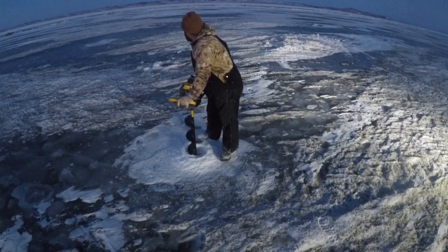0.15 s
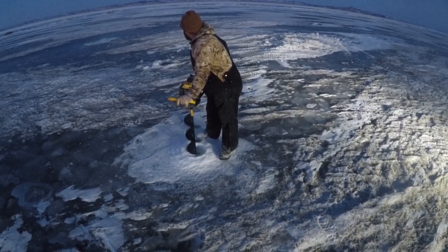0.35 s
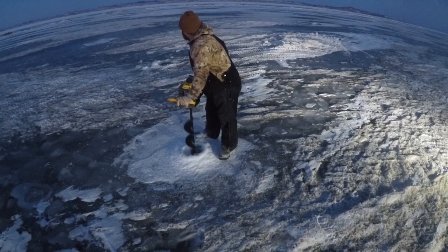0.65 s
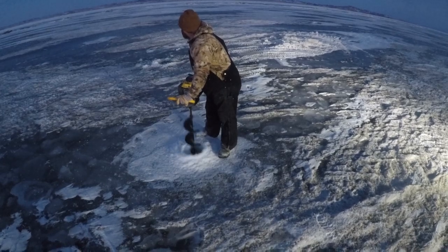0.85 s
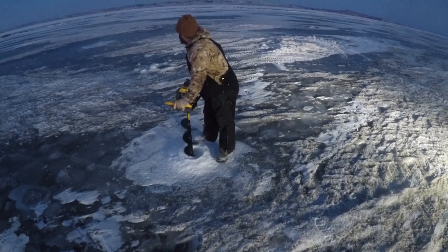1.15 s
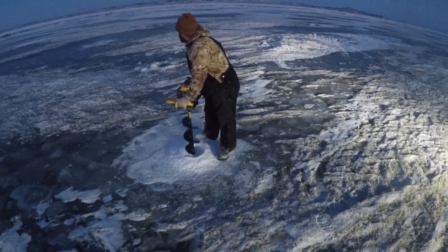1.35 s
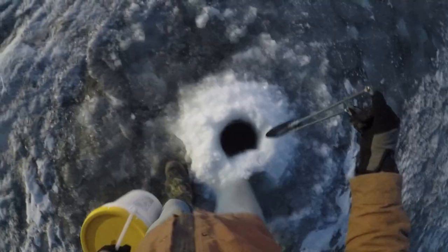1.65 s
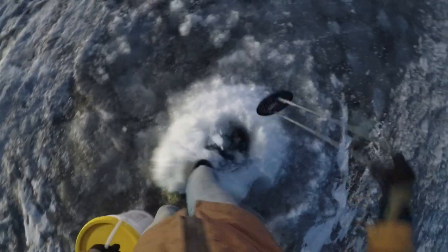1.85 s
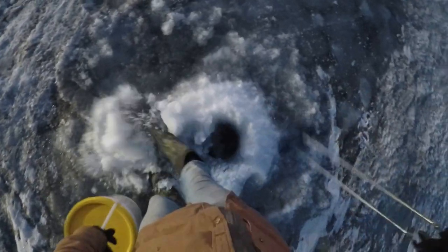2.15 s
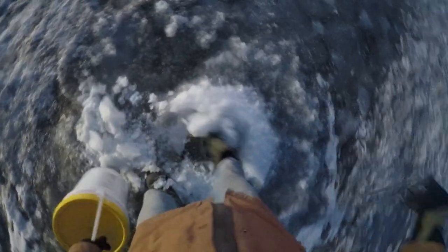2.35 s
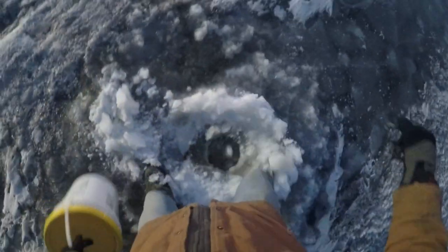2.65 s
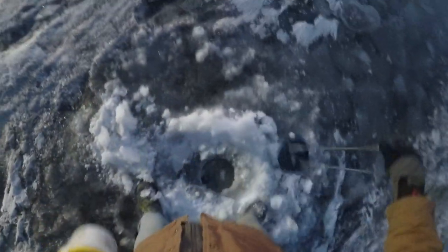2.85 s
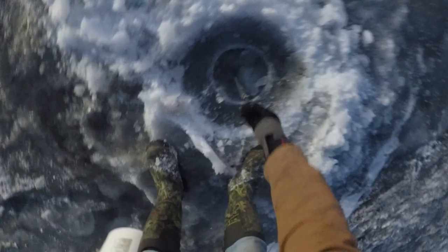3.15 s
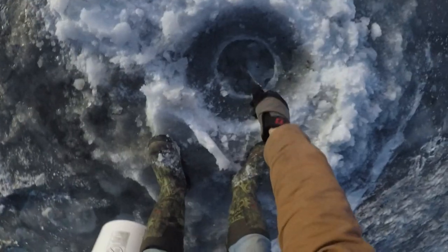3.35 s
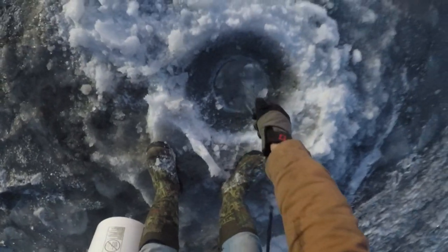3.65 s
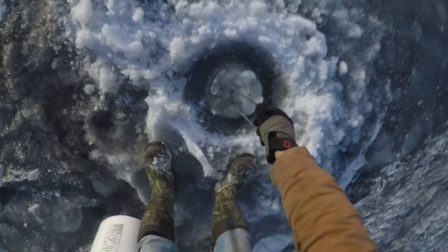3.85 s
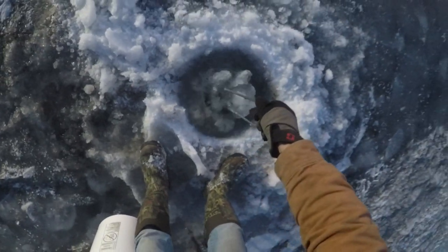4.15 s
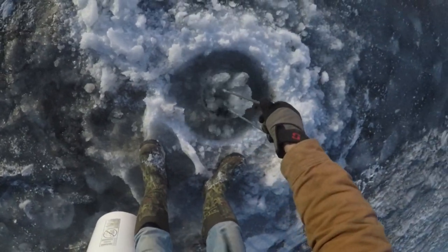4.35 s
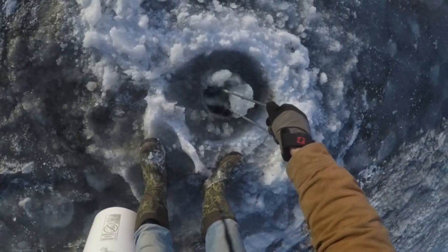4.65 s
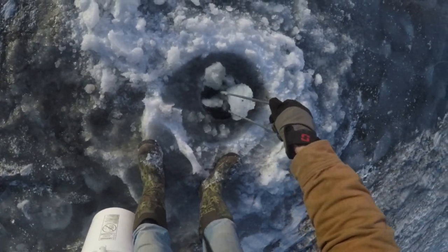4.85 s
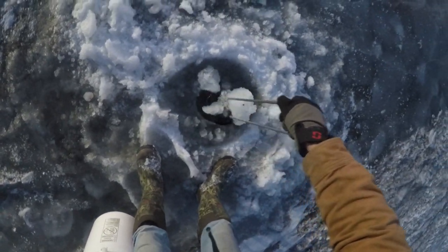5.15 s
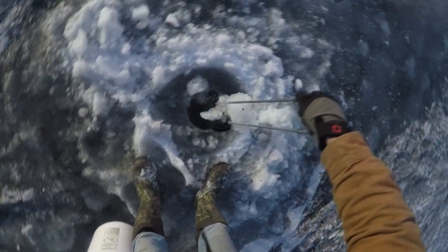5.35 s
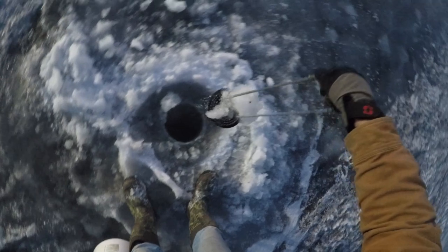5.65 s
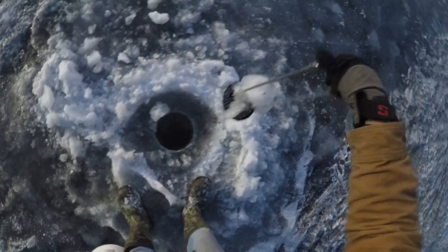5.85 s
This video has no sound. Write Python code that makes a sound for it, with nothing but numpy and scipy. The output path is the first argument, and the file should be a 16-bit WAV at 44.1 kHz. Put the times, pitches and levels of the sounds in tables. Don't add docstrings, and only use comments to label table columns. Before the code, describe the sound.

Loud, gritty engine drone with irregular metallic rasps fills the first part, close-miked in dry open air. It jumps abruptly to a quieter, higher-revving drone with icy swishes once per turn, then to a rattling rundown. A low lumpy exhaust beat continues throughout. Finally wet slush scrapes, plops and ticks beside the hole, and a scoop raps once on ice.

```python
import sys
import numpy as np
from scipy import signal
from scipy.fft import rfft, irfft
from scipy.io import wavfile
from scipy.ndimage import uniform_filter1d

SR = 44100
rng = np.random.default_rng(int(sys.argv[2]) if len(sys.argv) > 2 else 0)


def boost(x):
    u = np.asarray(x, float) / 20
    return 10 ** u


def transcribe(signal):
    frames = np.atleast_2d(signal).T
    limited = np.clip(frames, -1, 1)
    pcm = np.round(limited * 32767).astype(np.int16)
    wavfile.write(sys.argv[1], SR, pcm)


N = 264600
T = np.arange(N) / SR

CHANGES_S = (1.6625, 3.105)
# time_s, cycles_turned
IDLE_TURNS = [
    [(-0.032, 0), (0.8172, 9), (1.6912, 18)],
    [(1.6252, 0), (2.4957, 9), (2.7769, 12), (3.1644, 16)],
    [(2.986, 0), (3.189, 2), (3.384, 4), (3.566, 6), (3.755, 8), (4.34, 14), (4.531, 16), (4.904, 20),
     (5.298, 24), (5.678, 28), (6.065, 32)],
]
IDLE_LEVELS_DB = (-1, 0, -0.5)
# place_cycles, pressure, width_ms, scatter_db
EXHAUST_BEATS = [
    (-.056, .085, 2.1, 1.5),
    (0., -.185, 2.2, .7),
    (.232, -.25, 2.5, .7),
    (.27, .07, 19, .5),
    (.448, -.14, 3.1, 1.8),
    (.59, .04, 2.6, 2.5),
]
# time_s, cycle_rate_hz, blade_load_db
CLOSE_SPEED_LOAD = [
    (0, 38.45, -12),
    (.16, 37.87, 4),
    (.34, 38.3, -12),
    (.69, 39.88, -11),
    (.82, 39.07, 6),
    (.95, 37.48, 4.5),
    (1.12, 36.85, 0.5),
    (1.42, 38.81, -15),
    (1.66, 37.28, 11.5),
]
# time_s, cycle_rate_hz
FAR_SPEED = [
    (1.69, 42.13),
    (1.9, 39.76),
    (2.05, 39.17),
    (2.35, 39.56),
    (2.47, 38.97),
    (2.63, 38.65),
    (2.74, 40.83),
    (2.9, 40.54),
    (3.02, 39.7),
]
# time_s, cycle_rate_hz, level_db
RUNDOWN_SPEED = [
    (3.105, 43.8, -31.5),
    (3.16, 40.2, -33),
    (3.222, 36.5, -35.5),
    (3.31, 32.2, -37),
    (3.39, 31, -38),
    (3.55, 30.6, -40),
    (3.85, 28.6, -46),
    (4.6, 27, -50),
    (6, 27, -54),
]
# multiple_of_cycle_rate, level_db
CLOSE_TONES = [(1, -1.5), (2, -0.5), (3, -17.5), (4, -11.5), (5, -10.5), (6, -0.5), (7, -8.5), (8, -30),
               (9, 0.5), (10, -8), (11, -11), (12, -10), (13, -19), (14, -10), (15, -4.5), (16, -8),
               (17, -9), (18, -8.5)]
FAR_TONES = [(1, -16), (2, -1.5), (3, -5), (4, -14), (5, -3), (6, -10), (7, -12.5), (8, -16), (9, -20),
             (10, -16.5), (11, -22.5), (12, -20.5), (13, -44.5)]
RUNDOWN_TONES = [(3, 2), (4, 4), (5, -12), (6, -3), (7, -18), (10, -15), (12, -13)]
# pitch_hz, level_db_per_hz
CLOSE_ROAR_COLOUR = [(70, -38), (150, -15), (300, -14), (490, -18.5), (600, -9), (1050, -14.5), (1300, -6),
                     (1800, -4.5), (3200, -8), (3500, -13.5), (5950, -14.5), (6400, -20.5), (8100, -23),
                     (15500, -51)]
# pitch_hz, level_db_per_hz
FAR_ROAR_COLOUR = [(150, -6), (300, -6), (430, -7.5), (540, -11), (800, -4), (1050, -5.5), (1220, -1.5),
                   (1450, -1.5), (1700, -9.5), (1950, -4.5), (2800, -14.5), (3640, -7)]
# pitch_hz, width_hz, level_db
CASING_RESONANCES = [(590, 54, -4), (710, 180, -12), (906, 94, 0), (1223, 54, 7), (1390, 16, -18),
                     (1648, 25, 0.5), (1800, 105, -11.5), (2460, 113, -6), (3054, 41, -4.5),
                     (4350, 170, -11.5), (5230, 220, -12.5)]
# pitch_hz, width_hz, level_db
LOOSE_CASING = [(1450, 350, 2), (2150, 350, -1), (3500, 380, 1), (4400, 400, -2), (6050, 900, -8),
                (7500, 900, -15)]
# pitch_hz, width_hz, level_db
RASPING_PANELS = [(1230, 170, -3), (1750, 410, -1.5), (2460, 360, -1.5), (3062, 310, -1.5)]
# start_s, peak_db, pitch_hz
HARD_FIRINGS = [(0.0352, -5, 1787), (0.1925, -6.5, 1720), (0.2327, -5.5, 1700), (0.2963, -10.5, 1790),
                (0.3193, -10, 2495), (0.3441, -5.5, 3180), (0.3918, -8, 1850), (0.4429, -5, 1796),
                (0.492, -9, 1840), (0.537, -5, 1630), (0.5921, -8, 2150), (0.6266, -6.5, 2090),
                (0.681, -10.5, 1840), (0.7256, -7.5, 1587), (0.7731, -8, 2140), (0.8232, -5, 1830),
                (0.8755, -6, 1672), (0.9197, -4, 1810), (0.974, -5, 1790), (1.0214, -5, 1780),
                (1.071, -6, 1620), (1.0968, -5.5, 1630), (1.1281, -4.5, 1810), (1.175, -6, 1780),
                (1.2033, -5, 1770), (1.2366, -4, 1800), (1.285, -5.5, 2485), (1.33, -7, 2430),
                (1.3805, -4.5, 1827), (1.4265, -4, 1820), (1.477, -8.5, 1870), (1.514, -9.5, 1684),
                (1.5381, -10, 1830), (1.5724, -7, 1775), (1.6153, -3, 1670)]
# pitch_hz, level_db_per_hz
SHAVINGS_COLOUR = [(1290, -9), (2200, -8), (2880, -6.5), (3180, -5), (3450, -6), (4890, -1.5), (7980, -10),
                   (14600, -38.5), (15500, -43.5)]
# time_s, peak_db, rise_s, fall_s
SHAVING_FLINGS = [
    (2.17, -34, 0.029, .05),
    (2.37, -24, 0.046, .04),
    (2.56, -28.5, 0.02, 0.043),
    (2.76, -25.5, 0.027, 0.032),
    (2.93, -21.5, 0.024, 0.037),
    (3.065, -24, 0.029, 0.079),
]
# pitch_hz, level_db_per_hz
AIR_COLOUR = [(88, -13), (150, -2.5), (186, -7), (253, -16.5), (296, -12.5), (332, -19), (396, -21),
              (519, -26.5), (694, -28), (1190, -23), (1340, -24), (2750, -31), (15500, -64)]
# time_s, width_s, crackle_db
SLUSH_STIRS = [(3.18, 0.017, -33.5), (3.25, 0.027, -38), (3.597, 0.011, -38.5), (3.67, 0.019, -55),
               (4.65, 0.094, -54), (4.73, 0.011, -53), (4.87, 0.044, -52), (5.03, 0.0085, -60),
               (5.2, 0.072, -54), (5.42, 0.088, -48), (5.59, 0.046, -53), (5.72, 0.041, -60),
               (5.93, 0.02, -41)]
# time_s, level_db, rise_s, fall_s
SCOOP_DRAGS = [
    (4.64, -52, .04, .04),
    (4.83, -53, .03, .03),
    (4.91, -50, .04, .05),
    (5.15, -48.5, .04, .04),
    (5.21, -48.5, .02, 0.041),
    (5.32, -47.5, 0.04, 0.032),
    (5.42, -50, .03, .045),
    (5.56, -48, .012, 0.017),
    (5.61, -48, 0.013, 0.018),
    (5.92, -52, .02, .02),
]
# start_s, peak_db, pitch_hz, ring_s (time to fall 60 dB)
DRIP_EVENTS = [(1.762, -11, 515, 0.02), (2.36, -9.5, 393, 0.033), (3.115, -32, 562, 0.099),
               (3.14, -32, 433, 0.077), (3.358, -25, 1290, 0.025), (4.37, -38, 398, 0.12),
               (4.738, -27, 1340, 0.025), (4.752, -20.5, 875, 0.034), (4.755, -25, 405, 0.06),
               (4.771, -31, 860, .03), (4.79, -29, 800, .03), (5.075, -39, 3450, .02),
               (5.154, -35, 560, 0.12), (5.195, -35.5, 528, 0.15), (5.241, -23, 2130, 0.015),
               (5.267, -19, 2770, 0.017), (5.292, -23, 1680, 0.023), (5.335, -32, 1450, 0.03),
               (5.455, -33, 1090, .04), (5.486, -18.5, 2660, 0.015), (5.568, -18, 1800, 0.017),
               (5.741, -29, 5100, .012)]
# start_s, peak_db, pitch_hz, ring_s (time to fall 60 dB)
PLOP_EVENTS = [
    (3.322, -37, 400, .06),
    (4.7228, -18, 736, 0.051),
    (5.038, -24, 2900, 0.03),
]
# start_s, peak_db, pitch_hz
ICE_TICKS = [(3.5543, -38, 4160), (3.578, -40, 4500), (3.606, -37, 4800), (3.178, -36, 4600),
             (3.745, -39, 4200), (4.691, -35, 3900), (4.9133, -28, 2500), (4.856, -26.5, 1570),
             (4.832, -43, 6500), (4.843, -42, 6000), (5.076, -39, 8000), (5.084, -41, 6500),
             (5.157, -33, 5200), (5.175, -35, 4200), (5.2, -36, 2000), (5.268, -25.5, 2420),
             (5.292, -34, 2300), (5.332, -32, 1500), (5.3546, -37, 2500), (5.4135, -29, 2300),
             (5.487, -29, 2200), (5.521, -36, 5500), (5.539, -35, 4430), (5.55, -29, 1900),
             (5.582, -31, 1600), (5.6474, -32, 2300), (5.6754, -32, 5000), (5.783, -39, 5500),
             (4.584, -36, 6470), (4.7152, -39, 4270), (4.737, -32, 4280), (4.7735, -34, 4080),
             (4.809, -33, 7770), (4.817, -31, 4660), (4.8544, -22.5, 5420), (4.886, -29, 5340),
             (4.914, -39, 6000), (5.01, -35, 6060), (5.03, -30, 4100), (5.0624, -43, 8000),
             (5.0759, -33, 3500), (5.0988, -36, 3500), (5.1253, -35, 3500), (5.1654, -33, 5780),
             (5.2684, -29, 4980), (5.3802, -29, 4250), (5.4041, -32, 4470), (5.4143, -31, 4030),
             (5.4794, -28, 5500), (5.5503, -29, 5030), (5.5865, -27, 4620), (5.6062, -27, 4390),
             (5.6271, -33, 5710), (5.7409, -31, 5040), (5.7613, -34, 5690), (5.8524, -38, 5590)]
# pitch_hz, level_db, ring_s (time to fall 60 dB)
SCOOP_RINGS = [(736, 4.5, 0.029), (1236, 1, 0.04), (1556, 5, 0.042), (2520, 5.5, 0.025), (4630, -19, 0.039),
               (5060, -18.5, 0.048), (5120, -5, 0.039), (6200, -28, 0.059), (7800, -6, 0.028)]
# pitch_hz, level_db_per_hz
HISS_COLOUR = [(1500, -30), (3000, -2), (6000, 1), (9000, -11), (12000, -10), (15500, -12)]


def level(x, db=0.):
    return x * boost(db) / np.sqrt(np.mean(x ** 2))


def colour(x, points):
    hz, db = np.transpose(points)
    f = np.fft.rfftfreq(N, 1 / SR) + 1
    gain_db = np.interp(np.log(f), np.log(hz), db, left=-80, right=-90)
    return irfft(rfft(x) * boost(gain_db), N)


def band(x, hz, width):
    return signal.lfilter(*signal.iirpeak(hz, hz / width, SR), x)


def band_twice(x, hz, width):
    return band(band(x, hz, width), hz, width)


def walk(rate):
    hold = int(SR / rate)
    steps = np.repeat(rng.standard_normal(N // hold + 1), hold)
    return level(uniform_filter1d(uniform_filter1d(steps, hold), hold)[:N])


def grit(spread_db, hold_ms):
    hold = max(int(hold_ms * SR / 1000), 1)
    grain_db = spread_db * np.minimum(rng.exponential(size=N // hold + 1), 3.5)
    size = np.repeat(boost(grain_db), hold)[:N]
    return level(rng.standard_normal(N) * uniform_filter1d(size, hold))


def curves(table):
    s, *columns = np.transpose(table)
    return [np.interp(T, s, c) for c in columns]


def bumps(rows):
    total = 0
    for s, db, rise, fall in rows:
        side = np.where(T < s, rise, fall)
        total = total + boost(db) * np.exp(-.5 * ((T - s) / side) ** 2)
    return total


def ring(out, s, db, hz, t60, glide=0.):
    i = int(s * SR)
    t = T[:min(int(t60 * SR), N - i)]
    tone = np.sin(2 * np.pi * hz * (t + glide * t ** 2 / t60 * 2))
    shape = (1 - np.exp(-t / 0.0032)) * boost(-60 * t / t60)
    return out + np.pad(boost(db) * tone * shape, (i, N - i - len(t)))


def idling_engine(table):
    s, turns = np.transpose(table)
    cycles, thumps = np.arange(turns[-1] + 1), np.zeros(N)
    for place, pressure, width_ms, scatter_db in EXHAUST_BEATS:
        chance = rng.standard_normal((len(cycles), 2))
        times = np.interp(cycles + place, turns, s) + 0.000097 * chance[:, 0]
        sizes = boost(scatter_db * chance[:, 1])
        reach_s = width_ms / 250
        for at, size in zip(times, sizes):
            a, b = np.clip([int((at - reach_s) * SR), int((at + reach_s) * SR)], 0, N)
            thumps[a:b] += pressure * size * np.exp(-.5 * ((T[a:b] - at) * 1000 / width_ms) ** 2)
    out = thumps + boost(-5.5) * band(thumps, 104.6, 30) + boost(-25) * band(thumps, 244, 60)
    out = out + boost(1) * band_twice(thumps, 350, 110)
    return out - uniform_filter1d(out, size=4200)


def drone(phase, tones, wobble_db, smear):
    out = 0
    for k, db in tones:
        start = rng.random() * (1 if k < 13 else .22)
        gain = boost(db + wobble_db * walk(16))
        out = out + gain * np.sin(2 * np.pi * (k * phase + start) + smear * k * walk(24.86))
    return out


def auger_close():
    hz, bite_db = uniform_filter1d(curves(CLOSE_SPEED_LOAD), size=5000)
    phase = np.cumsum(hz) / SR
    drone_db = -18.5 - 2.5 * np.exp(-T / 0.19)
    roar_db = -16.5 + 0.11 * bite_db + (hz - 38.3)
    treble_db = -1 - 0.0012 * bite_db
    puff = grit(1.6, .8) * (.9 + .25 * np.exp(-((phase - .1) % 1) / .3)) * boost(.8 * walk(18))
    rung = puff
    for f, width, db in CASING_RESONANCES:
        rung = rung + boost(db + 2.5 + 1.6 * walk(21.9)) * band(puff, f, width)
    rung = rung + boost(bite_db - 9.0 + 2.1 * walk(40.64)) * band(puff, 2040, 350)
    roar = level(colour(rung, CLOSE_ROAR_COLOUR))
    high = signal.sosfilt(signal.butter(2, 3700, "high", fs=SR, output="sos"), roar)
    bright_roar = roar + (boost(treble_db + 7) - 1) * high
    tones = level(drone(phase, CLOSE_TONES, wobble_db=1.0, smear=0.033), 1.95)
    return boost(drone_db) * tones + boost(roar_db + 3.5) * bright_roar


def hard_firings():
    contrast = 1.41
    out, rasp = np.zeros(N), np.zeros(N + 900)
    for (s, db, hz), noise in zip(HARD_FIRINGS, rng.standard_normal((len(HARD_FIRINGS), 900))):
        i = int(s * SR)
        out = ring(out, s - .002, contrast * db + 1.5, hz, t60=0.051)
        rasp[i:i + 900] += boost(contrast * db) * noise * np.exp(-T[:900] / 0.0085)
    panels = sum(boost(db) * band_twice(rasp[:N], hz, width) for hz, width, db in RASPING_PANELS)
    return out + boost(11.5) * panels


def flung_shavings():
    spray = boost(-23.5 - 11 * np.maximum(T - 2.07, 0))
    flung = np.hypot(spray, bumps(SHAVING_FLINGS))
    swish = colour(grit(2.0, .5) * boost(walk(30)), SHAVINGS_COLOUR)
    swish = swish + 0.38 * band(swish, 4350, 500) + 0.14 * band(swish, 4900, 400)
    return flung * level(swish, -0.85)


def auger_far():
    hz = uniform_filter1d(curves(FAR_SPEED)[0], size=2000)
    phase = np.cumsum(hz) / SR
    drone_db = -32 + 0.5 * walk(11.5)
    roar_db = -30.5 - 3 * (T - CHANGES_S[0]) + 0.5 * walk(18)
    puff = grit(1.5, .8) * (1 + .3 * np.cos(2 * np.pi * (phase + .1))) * boost(.7 * walk(25))
    casing_db = -2 + 7.4 * np.exp(-((T - 2.6) / .25) ** 2)
    roar = level(colour(puff + boost(casing_db) * band(puff, 1226, 70), FAR_ROAR_COLOUR), 0.18)
    fan = colour(grit(1.2, 1.0), [(1800, -32), (2500, 2), (6000, -12), (9000, -12.5), (15500, -25)])
    bolt_loosens = np.clip((T - 2.72) / 0.18, 0, 1)
    buzz = boost(-40) * bolt_loosens * level(band(band(puff, 2000, 260), 1950, 260))
    snap = np.exp(-((phase + .01) % 1) / .09) * boost(2.5 * walk(35)) * rng.standard_normal(N)
    snap = colour(snap, [(2000, -7), (5000, 0), (9000, -10), (15500, -23)])
    port = boost(3 * (T - 1.5)) * level(snap, -45)
    tones = level(drone(phase, FAR_TONES, wobble_db=1.2, smear=.012), 3.5)
    engine = boost(drone_db) * tones + boost(roar_db) * roar
    return engine + flung_shavings() + level(fan, -37.5) + buzz + port


def drips_and_plops():
    out = np.zeros(N)
    for drip in DRIP_EVENTS:
        out = ring(out, *drip, glide=0.035)
    for plop in PLOP_EVENTS:
        out = ring(out, *plop, glide=0.393)
    return out


def auger_rundown():
    hz, db = curves(RUNDOWN_SPEED)
    phase = np.cumsum(uniform_filter1d(hz, size=1500)) / SR
    since = .86 * (phase - phase[int(3.393 * SR)])
    valves = np.exp(-(since % 1) / .09) + .8 * np.exp(-((since - .4) % 1) / .09)
    shake = grit(1.55, 0.59) * (0.55 + valves)
    rattle = level(sum(boost(g) * band_twice(shake, f, width) for f, width, g in LOOSE_CASING))
    rattle_db = -12 * np.maximum(T - 3.2, 0) - 6.0
    eighth_db = -7 - 30 * np.maximum(T - 3.26, 0)
    eighth_tone = boost(eighth_db) * np.sin(2 * np.pi * 8 * phase)
    tones = drone(phase, RUNDOWN_TONES, wobble_db=1.2, smear=.012)
    tones = level(band(tones, 166, 110.4) + 0.43 * tones, 1)
    return boost(db) * (tones + eighth_tone + boost(rattle_db) * rattle)


def fizz(count, low_hz, octaves, cycles):
    out = np.zeros(N + 800)
    for at, pitch, size in rng.random((count, 3)):
        i = int((CHANGES_S[1] + at * (T[-1] - CHANGES_S[1])) * SR)
        turns = low_hz * 2 ** (octaves * pitch) * T[:800]
        tone = np.sin(2 * np.pi * turns * (1 + 0.0095 * turns))
        out[i:i + 800] += boost(25 * size) * tone * turns * np.exp(-turns / cycles)
    return level(out[:N])


def snaps(count):
    first_s, last_s = 4.65, 5.93
    out, t = np.zeros(N), T[:300]
    for at, pitch, size in rng.random((count, 3)):
        i = int((first_s + at * (last_s - first_s)) * SR)
        hz = 2000 * 2 ** (2.3 * pitch)
        db = -51 + 1.0 - 7.0 * pitch - 4 * np.log(1 - .95 * size)
        shape = (t / 0.00045) * np.exp(1 - t / 0.00046)
        out[i:i + 300] += boost(db) * np.sin(2 * np.pi * hz * t) * shape
    return out


def ticks():
    out = np.zeros(N)
    for (s, db, hz), noise in zip(ICE_TICKS, rng.standard_normal((len(ICE_TICKS), 600))):
        i = int(s * SR)
        burst = noise * np.exp(-T[:600] / 0.0034)
        own = band_twice(burst, hz, 0.28 * hz)
        broad = band_twice(burst, 5400, 6500)
        both = own / np.abs(own).max() + boost(-6) * broad / np.abs(broad).max()
        out[i:i + 600] += boost(db - 4.0) * both
    return out


def hole():
    still_db = -59
    crackle_db = 20 * np.log10(boost(still_db) + bumps((s, db, w, w) for s, w, db in SLUSH_STIRS))
    settling_db = 14.5 * np.exp(-np.abs(T - CHANGES_S[1]) / 0.25)
    air_db = -48.5 + settling_db + 0.13 * (crackle_db - still_db)
    turns = np.interp(T, *np.transpose(IDLE_TURNS[2]))
    pulse = 1 + 0.15 * np.cos(2 * np.pi * turns - 1.2)
    air = boost(0.44 * (air_db + 56.5)) * level(colour(grit(2.67, 3.8), AIR_COLOUR), -43.5) * pulse
    tappets = level(band_twice(grit(2.1, 0.81), 5200, 2400), -60) * (1 + np.cos(2 * np.pi * (turns - 0.26)))
    crackle = boost(crackle_db + 1.5 * walk(60)) * level(colour(grit(4.2, .8), SHAVINGS_COLOUR), -4)
    wet = np.clip((T - 4.55) / 0.24, .15, 1)
    low_fizz = boost(air_db - 15.5) * fizz(count=900, low_hz=894, octaves=2.16, cycles=1.4)
    high_fizz = boost(crackle_db - 20.0) * fizz(count=700, low_hz=2150, octaves=1.78, cycles=2.5)
    bubbles = wet * (low_fizz + high_fizz)
    scrape_gain = np.hypot(wet * boost(crackle_db - 7), bumps(SCOOP_DRAGS)) * boost(2.9 * walk(45))
    scrape = scrape_gain * level(band_twice(grit(3.2, 2.9), 1600, 1900))
    return air + crackle + bubbles + tappets + scrape + snaps(count=420) + ticks()


def knock():
    start_s, peak_db = 5.9532, -12.5
    t = np.maximum(T - start_s, 0)
    rise = 1 - np.exp(-t / 0.00057)
    crack = rise * np.exp(-t / 0.0026) * grit(2.3, 1.0)
    tail = rise * np.exp(-t / 0.0069) * grit(1.5, .6)
    bright = band(band(crack, 5400, 3200), 5400, 3000) + boost(-18) * band(crack, 8800, 5000)
    rough = boost(9.5) * band_twice(tail, 1600, 3100) + boost(-6) * band(tail, 5000, 3000)
    out = boost(peak_db) * (boost(11.0) * bright + rough)
    for hz, db, t60 in SCOOP_RINGS:
        out = ring(out, start_s + 0.00206, peak_db + db - 0.5, hz, min(t60, .12))
    return out


def scene():
    view_now = np.searchsorted(CHANGES_S, T)
    views = (auger_close(), auger_far(), auger_rundown() + hole())
    out = hard_firings() + drips_and_plops() + knock()
    for k, view in enumerate(views):
        gate = uniform_filter1d(1. * (view_now == k), size=60)
        out = out + gate * (view + boost(IDLE_LEVELS_DB[k]) * idling_engine(IDLE_TURNS[k]))
    return out[None]


def top_cut(x):
    return signal.sosfilt(signal.butter(12, 15610, fs=SR, output="sos"), x)


def record(dry):
    dull = signal.sosfilt(signal.butter(2, 11000, fs=SR, output="sos"), dry)
    hiss = level(colour(rng.standard_normal(N), HISS_COLOUR), -65.5)
    mix = np.tanh(0.8 * (dull + hiss)) / 0.82
    return top_cut(mix)


dry = scene()
out = record(dry)
transcribe(out)
```